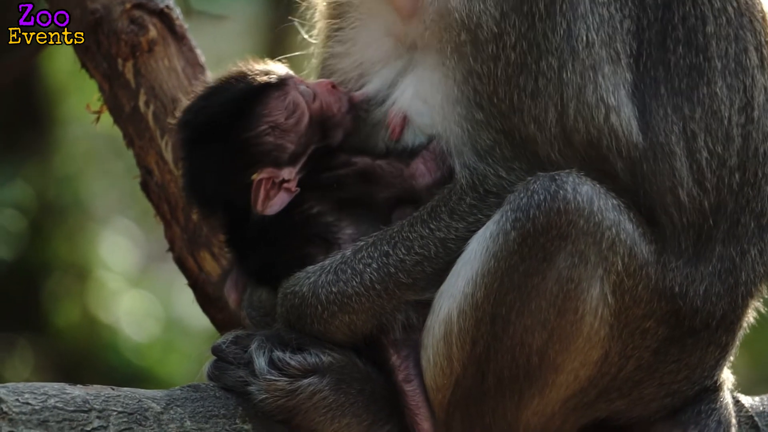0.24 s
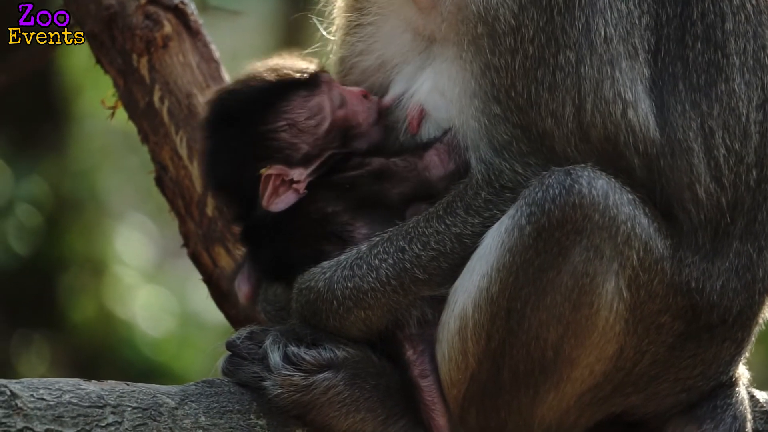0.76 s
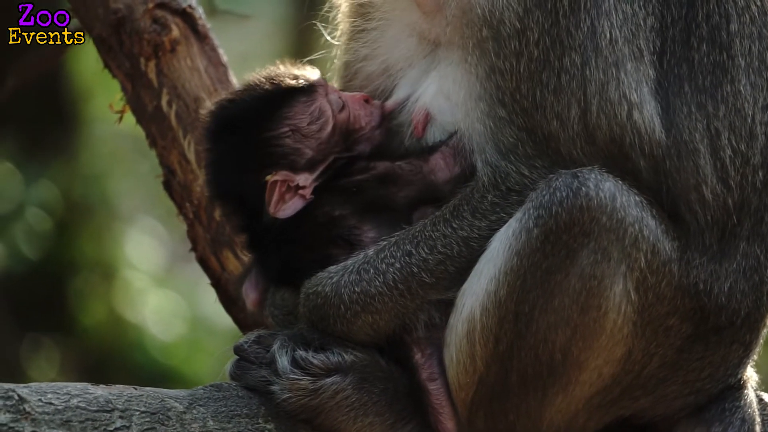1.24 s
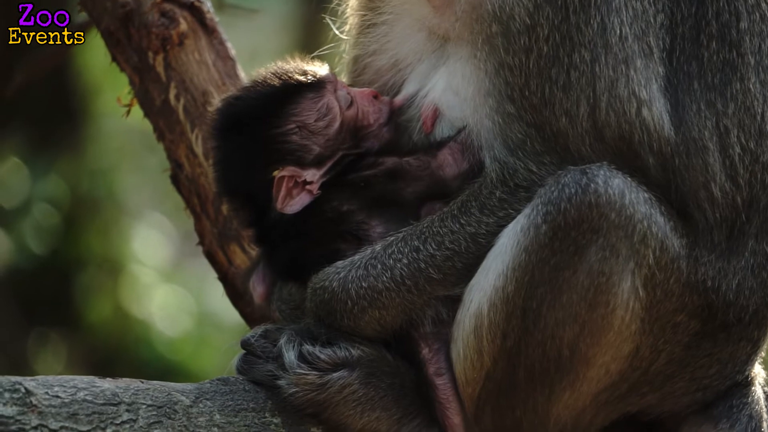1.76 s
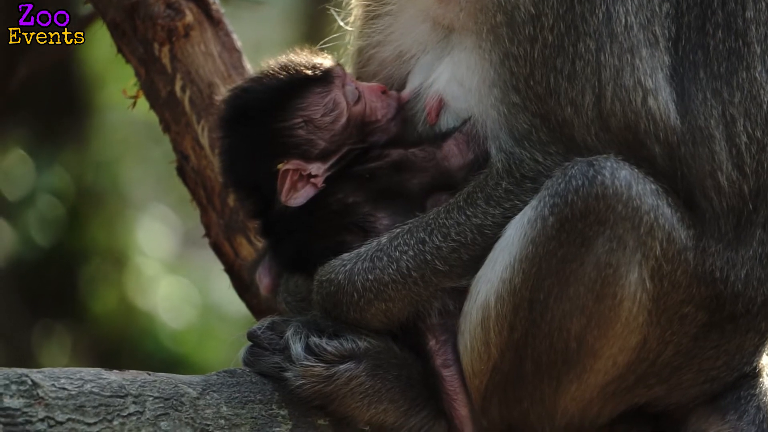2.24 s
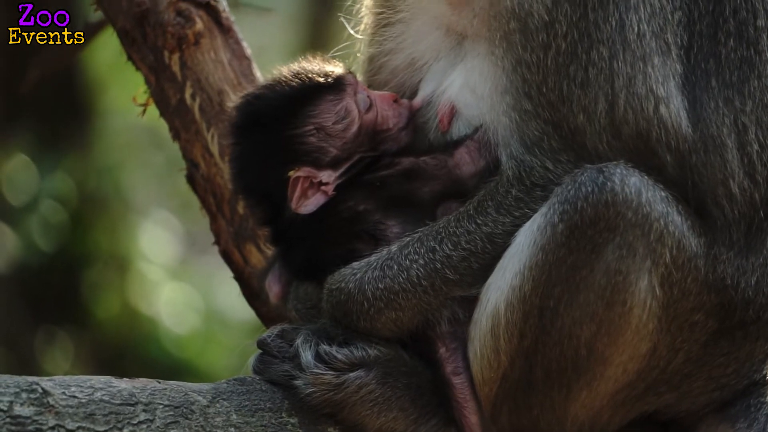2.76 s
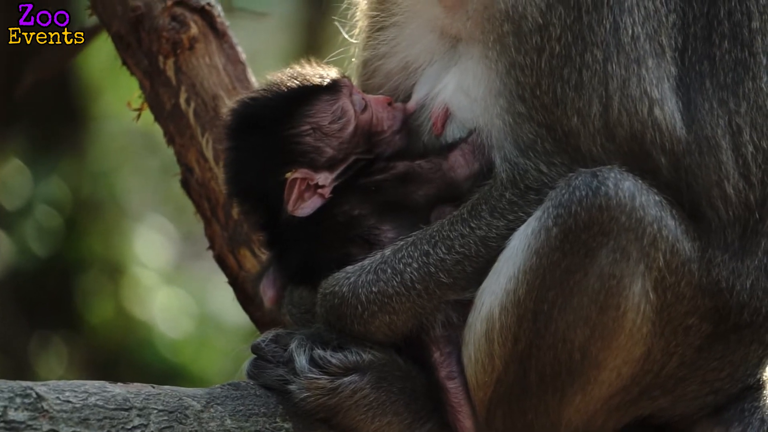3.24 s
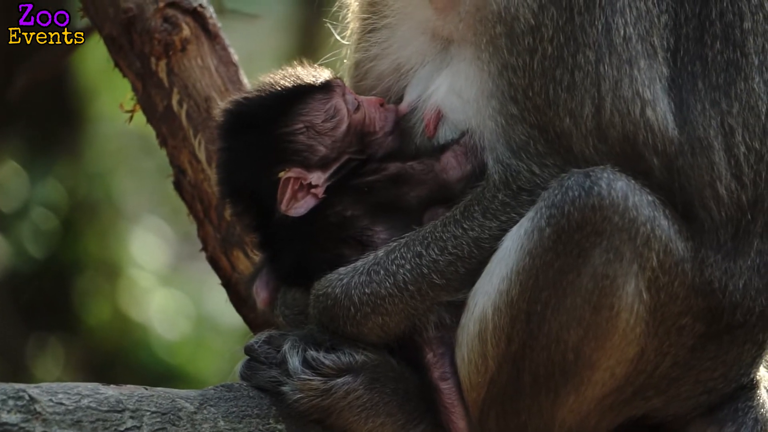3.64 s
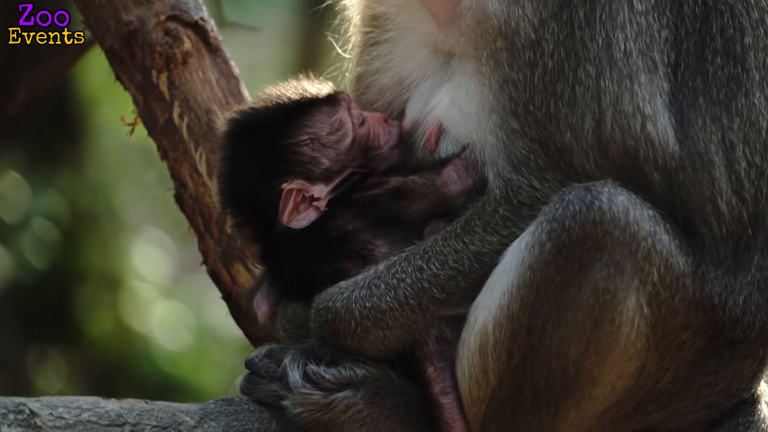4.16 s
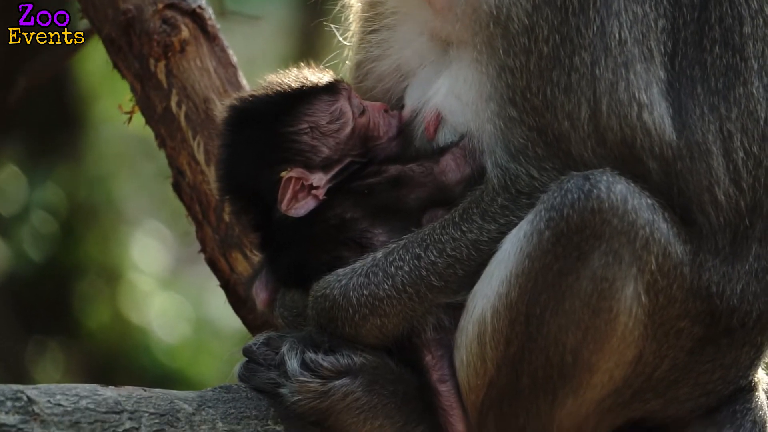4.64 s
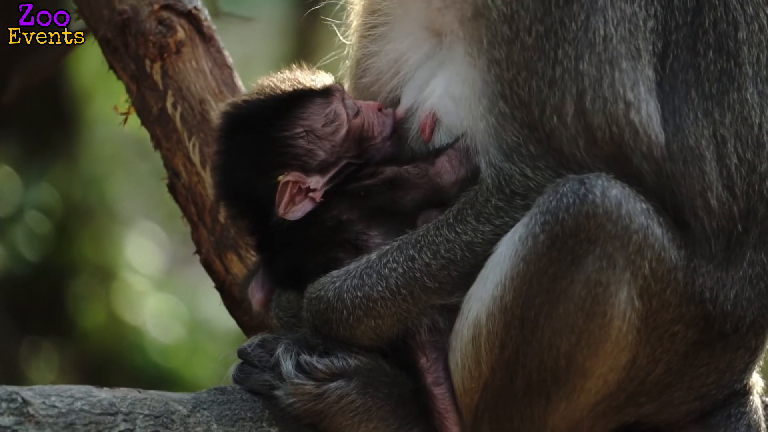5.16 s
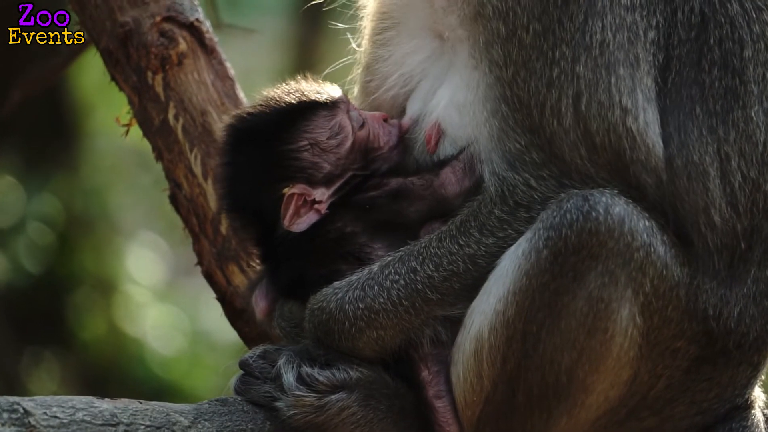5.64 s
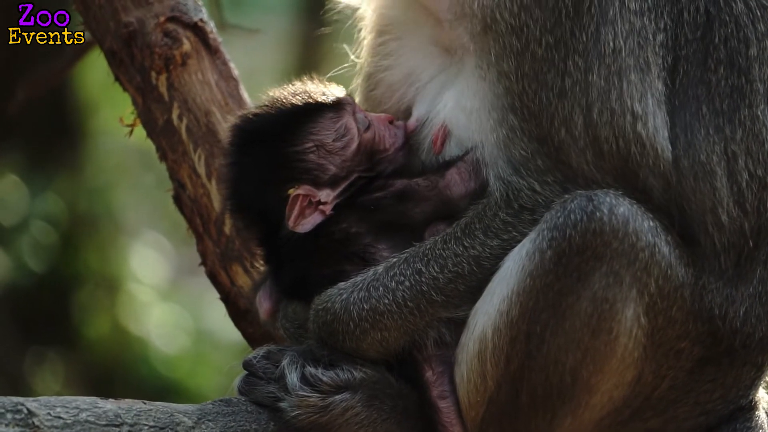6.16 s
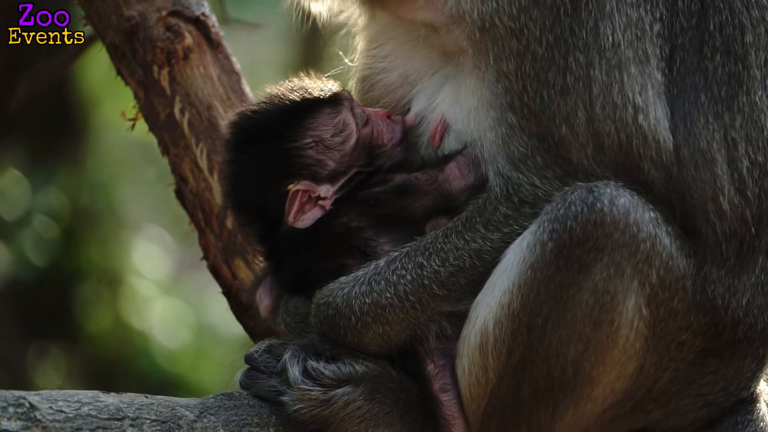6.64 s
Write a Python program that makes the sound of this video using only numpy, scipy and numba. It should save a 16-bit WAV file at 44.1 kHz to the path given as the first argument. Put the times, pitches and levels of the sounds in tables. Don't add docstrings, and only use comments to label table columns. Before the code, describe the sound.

Outdoors among trees, a close monkey barks harshly three times, about three seconds apart, each under half a second with an echo fading for most of a second. Between them are faint hoots from other monkeys, thin bird chirps and whistles, and a tiny twig snap. Distant moans cluster just before the last bark. Soft hiss, high insect buzz on the right and a faint idling engine continue throughout. Stereo microphones, barks slightly left.

```python
import sys
import numpy as np
from scipy import signal
from scipy.fft import rfft, irfft, next_fast_len
from scipy.io import wavfile
from scipy.ndimage import uniform_filter1d
from numba import njit

SR = 44100
rng = np.random.default_rng(int(sys.argv[2]) if len(sys.argv) > 2 else 0)


def waveform_to_disk(signal):
    frames = np.transpose(np.atleast_2d(signal))
    scaled = np.clip(frames, -1, 1) * 32767
    samples = np.round(scaled).astype(np.int16)
    wavfile.write(sys.argv[1], SR, samples)


def how_loud(loudness_db):
    steps = np.asarray(loudness_db, float) / 20
    return 10 ** steps


N = 303981
T = np.arange(N) / SR

# start_s, effort_db, fold_pulse_hz
BARKS = [
    [(.59, -52, 758.6), (.62, -33.5, 781.8), (.68, -28.5, 821.7), (.74, -25, 792.5), (.87, -25.5, 804.3),
     (.96, -34, 763)],
    [(3.41, -53, 797.3), (3.43, -38, 803.4), (3.52, -27.5, 817.6), (3.62, -26.5, 841.3), (3.72, -28, 805.5),
     (3.8, -28.5, 781.3)],
    [(6.135, -42.5, 760.5), (6.183, -39, 853.5), (6.195, -25, 794.4), (6.26, -27.5, 857.5),
     (6.33, -27.5, 863), (6.4, -27.5, 825.6), (6.46, -30.5, 724), (6.54, -29, 702.7)],
]


def level(x, db):
    return x * how_loud(db) / np.sqrt(np.mean(x ** 2))


def band(x, hz, width_hz):
    return signal.lfilter(*signal.iirpeak(hz, hz / width_hz, fs=SR), x)


def steep_band(x, hz, width_hz):
    return band(band(x, hz, width_hz), hz, width_hz)


def modes(x, table):
    out = 0
    for k, (hz, width_hz, db) in enumerate(table):
        out = out + (-1) ** k * how_loud(db) * steep_band(x, hz, 1.5 * width_hz)
    return out


def on_log(table, hz):
    table_hz, value = np.transpose(table)
    return np.interp(np.log(hz + 1), np.log(table_hz), value)


def walk(rate, size=N):
    k = int(SR / rate)
    held = np.repeat(rng.standard_normal(size // k + 1), k)
    return 1.3 * uniform_filter1d(uniform_filter1d(held, k), k)[:size]


def pulses(hz, size_db, jitter, weak):
    turns = np.cumsum(hz) / SR
    count = np.arange(1, int(turns[-1]))
    at = np.interp(count, turns, np.arange(N))
    i = at.astype(int)
    late, strength = rng.standard_normal((2, len(count)))
    at = np.clip(at + jitter[i] * late * SR / hz[i], 0, N - 2)
    weak_pairs, weak_threes = weak
    size = how_loud(size_db[i] * strength)
    size = size * (1 - weak_pairs[i] * (count % 2))
    size = size * (1 - weak_threes[i] * (count % 3 > 0))
    i, part = at.astype(int), at % 1
    return np.bincount(i, size * (1 - part), N) + np.bincount(i + 1, size * part, N)


def notes(table, waver_hz, scoop=0, rasp=6, patchy_db=-2.95):
    scoop_s = .018
    out = np.zeros(N)
    for start_s, length_s, from_hz, to_hz, db in table:
        size = int(length_s * SR)
        u = np.arange(size) / (length_s * SR)
        slow, quick = walk(60.37, size), walk(31.0, size)
        span = int(SR / (rasp * waver_hz)) + 1
        flutter = np.sqrt(span) * uniform_filter1d(rng.standard_normal(N // 4), span)[:size]
        glide = from_hz + (to_hz - from_hz) * u
        hz = glide * (1 - scoop * np.exp(-u * length_s / scoop_s)) + waver_hz * slow
        edges = np.clip(np.minimum(u, 1 - u) * length_s / 0.01, 0, 1)
        swell = edges * how_loud(db + 4.0 + patchy_db * quick)
        tone = np.sin(2 * np.pi * np.cumsum(hz) / SR)
        out[int(start_s * SR):][:size] += swell * (1 + waver_hz / 110 * flutter) * tone
    return out


def place(x, direct_db, wet_db, lead, shared, pan_db):
    # hz, t60_s
    fading = [(300, 1), (800, 1), (1400, 1), (2500, 0.34), (4000, 0.7), (8000, 0.61)]
    t = np.arange(int(1.3 * SR)) / SR
    one, left, right = rng.standard_normal((3, len(t)))
    keep = shared * np.exp(-t / 0.43)
    common = np.array([one, np.roll(one, lead) * how_loud(-pan_db)])
    noise = common * np.sqrt(keep) + np.array([left, right]) * np.sqrt(1 - keep)
    tail = 0
    for hz in 400 * 2 ** np.arange(0, 5.1, .5):
        tail = tail + band(noise, hz, hz / 2.2) * how_loud(-60 * t / on_log(fading, hz))
    tail = tail * (1 - np.exp(-t / 0.0064))
    tail = tail * how_loud(wet_db) / np.sqrt(np.mean(np.sum(tail ** 2, axis=1)))
    tail[0, 0], tail[1, lead] = how_loud(direct_db), how_loud(direct_db - pan_db)
    return signal.fftconvolve(x[None], tail, axes=1)[:, :N]


def air():
    # hz, level_db (per Hz)
    hiss = [(25, -51), (61, -7.5), (110, 1.5), (250, -5.5), (480, -5.5), (750, -3), (2360, -5.5),
            (4000, -11.5), (6000, -15.5), (9000, -12), (12200, -30), (15700, -41)]
    # hz, side_minus_mid_db
    spread = [(60, -40), (110, -11), (200, -5.5), (380, 2), (700, 2), (1290, 2), (2380, 0.5), (4400, 0.5),
              (8120, 1.5), (15000, 13.5)]
    size = next_fast_len(N)
    hz = np.fft.rfftfreq(size, 1 / SR)

    def shaped(extra_db):
        return irfft(rfft(rng.standard_normal(size)) * how_loud(on_log(hiss, hz) + extra_db), size)[:N]

    mid, side = shaped(0), shaped(on_log(spread, hz))
    return level(np.array([mid + side, mid - side]), -57.5) * how_loud(.7 * walk(.6))


def engine():
    # start_s, firings_hz, level_db
    idle = [(0, 20.3, -62), (0.501, 18.7, -65.5), (1.9, 18.2, -64), (2.63, 16.3, -63.5), (2.9, 18.6, -69),
            (4.1, 17.7, -65), (4.7, 19.5, -68), (6, 18.4, -63.5), (6.89, 19.8, -68)]
    # hz, width_hz, level_db
    exhaust = [(108, 17, 1.5), (147.3, 31, -3), (255, 68, -12.5)]
    # centre_s, depth_db
    stumbles = [(.54, 0), (2.75, -18), (3.47, 0), (3.99, -23)]
    stumble_s = .17
    s, hz, db = np.transpose(idle)
    even, none = np.ones(N), np.zeros(N)
    firings = pulses(np.interp(T, s, hz), 2 * even, 0.05 * even, (none, none))
    miss_db = sum(depth_db * np.exp(-((T - at) / stumble_s) ** 2) for at, depth_db in stumbles)
    return level(modes(firings, exhaust), -2.5) * how_loud(np.interp(T, s, db) + miss_db)


def insects():
    # hz, width_hz, level_db, left_minus_right_db
    choirs = [(8510, 680, -68, -9), (10230, 470, -67.5, -9.5), (10850, 600, -67.5, -6),
              (14800, 3300, -78.5, -10.5)]
    cricket_hz, ticks_per_s, cricket_db = 12970, 24.3, -82.5
    out = 0
    for hz, width_hz, db, pan_db in choirs:
        near, left, right = (steep_band(rng.standard_normal(N), hz, 1.6 * width_hz) for _ in range(3))
        sides = np.array([np.roll(near, 7) + 1.05 * left, near + 2.0 * right])
        sides = sides * how_loud(0.66 * walk(1.24) + 0.5 * walk(40))
        out = out + level(sides, db) * how_loud(np.array([[pan_db], [-pan_db]]) / 2)
    tick = np.exp(-(((T - .005) * ticks_per_s % 1 - .2) / .09) ** 2) * how_loud(2.5 * walk(3.1))
    cricket = level(tick * np.sin(2 * np.pi * cricket_hz * T), cricket_db)
    return out + cricket * np.array([[.4], [1]])


def rustle():
    start_s, length_s, hz = 5.75, .18, 6000
    shake = np.exp(-((T - start_s) / length_s) ** 4) * how_loud(-71 + 3 * walk(25))
    return shake * level(steep_band(rng.standard_normal(N), hz, 3500), 0)


def twig():
    t = np.maximum(T - 4.752, 0)
    return (t > 0) * how_loud(-49) * np.exp(-t / 0.0077) * band(rng.standard_normal(N), 3500, 3300)


def peeps():
    # start_s, length_s, from_hz, to_hz, level_db
    calls = [(2.36, 0.056, 822, 960, -64), (2.86, 0.056, 770, 762, -63), (4.35, .05, 2733, 2460, -67.5),
             (4.87, 0.059, 750, 963, -64), (4.92, 0.045, 795, 755, -62), (4.9, 0.097, 2304, 2360, -62.5),
             (5.24, .054, 1810, 1890, -69)]
    return notes(calls, waver_hz=11)


def birds():
    # upstroke_s, top_hz, level_db
    chirps = [(.5, 5100, -70), (1.36, 5000, -71.5), (2.37, 5300, -70.5), (4.54, 5600, -76)]
    # start_s, length_s, level_db
    whistles = [(3.18, .2, -74), (3.3, .45, -69), (3.8, .63, -77), (5.44, .17, -76), (5.9, .2, -74),
                (6.05, .5, -70)]
    low_hz, rise_hz_per_s = 3830, 12500
    dip_hz, dip_s, dip_db = 4450, .06, -5
    whistle_hz, squeak_s, squeak_hz, squeak_db = 4530, 5.25, 4000, -74
    dips = [(s - dip_s, dip_s, dip_hz, low_hz, db + dip_db) for s, top, db in chirps]
    rises = [(s, (top - low_hz) / rise_hz_per_s, low_hz, top, db) for s, top, db in chirps]
    level_tones = [(s, length, whistle_hz, whistle_hz, db) for s, length, db in whistles]
    level_tones += [(squeak_s, .1, k * squeak_hz, k * squeak_hz, squeak_db) for k in (1, 3)]
    return notes(dips + rises, waver_hz=42, patchy_db=2) + notes(level_tones, waver_hz=8, patchy_db=2)


def troop():
    # start_s, length_s, top_hz, end_hz, level_db
    moans = [
        (5.31, .24, 885, 860, -53),
        (5.63, .2, 1185, 1135, -50),
        (5.83, .33, 935, 960, -51),
    ]
    # hz, gain_db
    moan_throat = [(750, -13), (900, -9), (1150, 0), (1800, 0), (2350, -3), (2560, -12), (2850, -9),
                   (3500, -30)]
    # start_s, length_s, from_hz, to_hz, level_db
    hoots = [(.08, 0.063, 1950, 1916, -62), (1.55, 0.06, 2620, 2037, -55.5),
             (1.56, 0.29, 2507, 2520, -63.5), (1.72, 0.084, 1081, 1142, -48.5), (1.73, .1, 807, 758, -59.5),
             (1.86, 0.085, 1566, 1660, -62), (2.03, 0.095, 1860, 1944, -59.5),
             (2.53, .075, 2190, 2820, -62), (4.13, 0.071, 1150, 1179, -51.5), (4.2, .26, 1397, 1343, -68.5),
             (5.18, 0.057, 1083, 1180, -63), (5.33, 0.28, 1870, 1858, -66), (5.5, .3, 1945, 1883, -59.5),
             (5.53, 0.13, 2030, 2985, -62), (5.61, .1, 1480, 1889, -56), (5.62, 0.18, 2830, 2770, -64),
             (5.66, 0.1, 1036, 1011, -52), (5.82, .32, 1081, 949, -52), (5.86, 0.26, 2300, 2360, -60.5)]
    calls = 0
    for k in (1, 2, 3):
        partial = []
        for s, length_s, top_hz, end_hz, db in moans:
            partial.append((s, length_s, k * top_hz, k * end_hz, db + on_log(moan_throat, k * top_hz)))
        calls = calls + notes(partial, waver_hz=k * 30, scoop=.18)
    calls = calls + notes(hoots, waver_hz=60)
    return signal.sosfilt(signal.butter(4, 720, "high", fs=SR, output="sos"), calls)


@njit
def moving_band(x, g, k):
    y, b, low = np.empty(len(x)), 0., 0.
    for i in range(len(x)):
        v = (b + g[i] * (x[i] - low)) / (1 + g[i] * (g[i] + k[i]))
        b, low, y[i] = 2 * v - b, low + 2 * g[i] * v, k[i] * v
    return y


def voice_state():
    # clear_s, threes_s (until pulses pass from pairs to threes), change_s
    breaks = [
        (.018, .115, .03),
        (0, .3, .25),
        (.051, .6, .1),
    ]
    # share_of_bark, throat_hz
    jaw = [(0, 1150), (.12, 1170), (.33, 1340), (.62, 1310), (.85, 1090), (1, 1050)]
    sac_fill = [-7.5, -4.5, -7.5]
    clear_rough, broken_rough, rough_grows_s, most_grouping = .05, .22, .055, .85
    throat_start_db, throat_end_db, throat_clear_db = -4.5, -2, 9
    which = np.searchsorted([b[0][0] - .1 for b in BARKS[1:]], T)
    start, end = np.array([(b[0][0], b[-1][0]) for b in BARKS])[which].T
    clear_s, threes_s, change_s = np.array(breaks)[which].T
    age = T - start
    share = np.clip(age / (end - start), 0, 1)
    broken = np.clip((age - clear_s) / .008, 0, 1)
    threes = np.clip((age - threes_s) / change_s + .5, 0, 1)
    growth = np.clip((age - 1.5 * clear_s) / rough_grows_s + (clear_s == 0), 0, 1)
    rough = clear_rough + (broken_rough - clear_rough) * growth
    s, effort_db, hz = np.vstack(BARKS).T
    effort_db, hz = np.interp(T, s, effort_db), np.interp(T, s, hz)
    throat_db = throat_start_db + (throat_end_db - throat_start_db) * share + throat_clear_db * (1 - broken)
    grouping = most_grouping * broken * (1 - threes), most_grouping * broken * threes
    throat_hz = np.interp(share, *np.transpose(jaw))
    return effort_db, throat_db, hz, grouping, rough, throat_hz, np.array(sac_fill)[which]


def monkey():
    # hz, width_hz, level_db
    sac = [(832, 330, -4.5)]
    # hz, width_hz, level_db
    mouth = [(2017, 238, -2.5), (2520, 385, 1.5), (3100, 400, -4.5), (3392, 435, -3.5), (4070, 550, -15.5),
             (4900, 860, -22), (6100, 760, -51)]
    throat_width_hz, wobble_db = 460., 1.6
    gate_open_s, gate_shut_s = .014, .06
    effort_db, throat_db, hz, grouping, rough, throat_hz, sac_db = voice_state()
    folds = level(pulses(hz * (1 + .1 * rough * walk(60)), 12 * rough, .24 * rough, grouping), 0)
    breath = rough * rng.standard_normal(N)
    deep = folds + 4.5 * breath
    shape = np.tan(np.pi * throat_hz / SR), throat_width_hz / throat_hz
    throat = moving_band(moving_band(deep, *shape), *shape)
    low = level(how_loud(sac_db) * modes(deep, sac) - throat, 0)
    high = level(modes(folds + 3 * breath, mouth), 2.25)
    gate = 0
    for bark in BARKS:
        opening = (T - bark[0][0]) / gate_open_s
        shutting = (bark[-1][0] - T) / gate_shut_s
        gate = gate + np.clip(np.minimum(opening, shutting), 0, 1)
    lungs = how_loud(uniform_filter1d(effort_db, size=SR // 60))
    low = how_loud(throat_db + wobble_db * walk(35)) * low
    high = how_loud(wobble_db * walk(35)) * high
    voice = gate * lungs * (low + high)
    voice = voice - .6 * band(voice, 1620, 320)
    return signal.sosfilt(signal.butter(8, 695, "high", fs=SR, output="sos"), voice)


def scene():
    near = place(monkey(), direct_db=-3.5, wet_db=-4.0, lead=5, shared=.55, pan_db=4.2)
    far = place(troop(), direct_db=-3, wet_db=-3, lead=3, shared=.3, pan_db=0)
    canopy = birds() + peeps() + twig() + rustle()
    high = place(canopy, direct_db=0, wet_db=-4, lead=2, shared=.4, pan_db=0)
    return near + far + high + insects() + engine() + air()


def band_limit(x):
    return signal.sosfilt(signal.butter(12, 15700, fs=SR, output="sos"), x)


def record(dry):
    top_hz = 15710
    size = next_fast_len(N)
    passed = np.fft.rfftfreq(size, 1 / SR) < top_hz
    mix = irfft(rfft(dry, size) * passed, size)[:, :N]
    return band_limit(mix)


dry = scene()
out = record(dry)
waveform_to_disk(out)
```